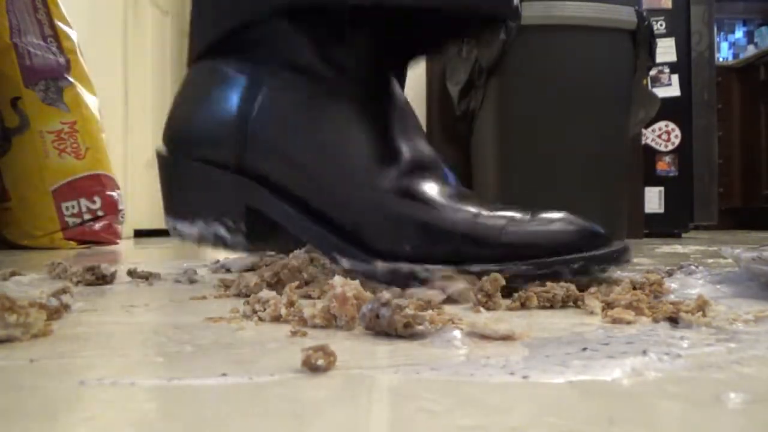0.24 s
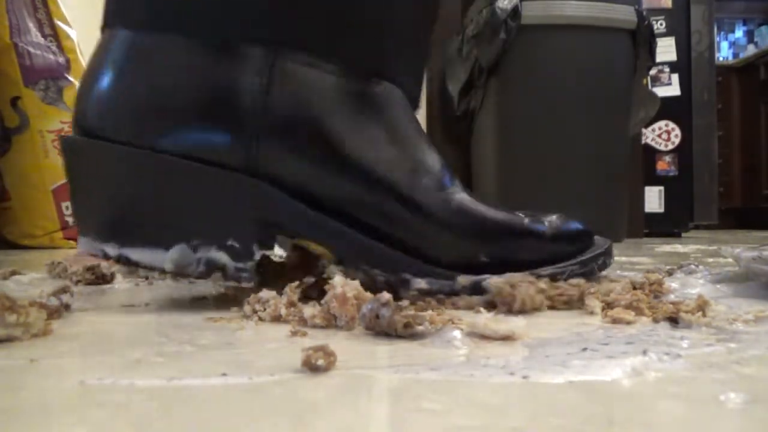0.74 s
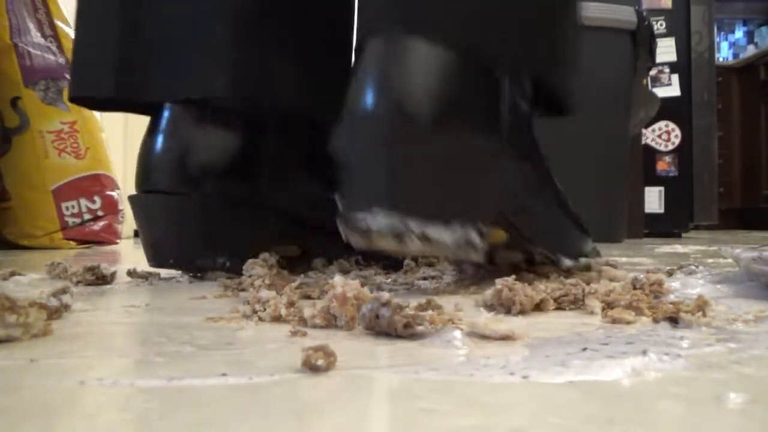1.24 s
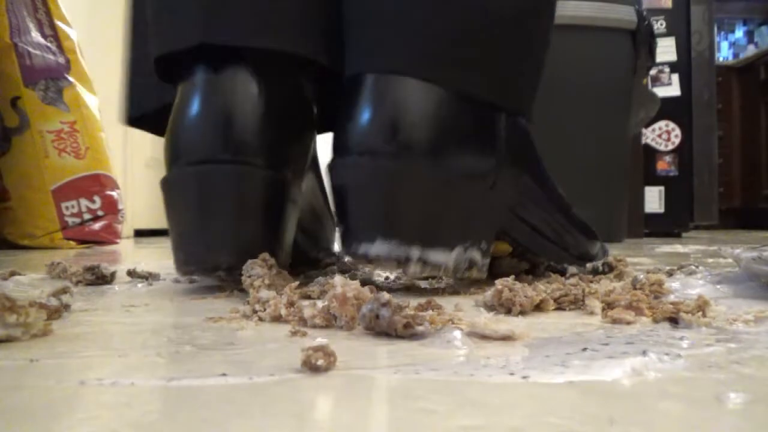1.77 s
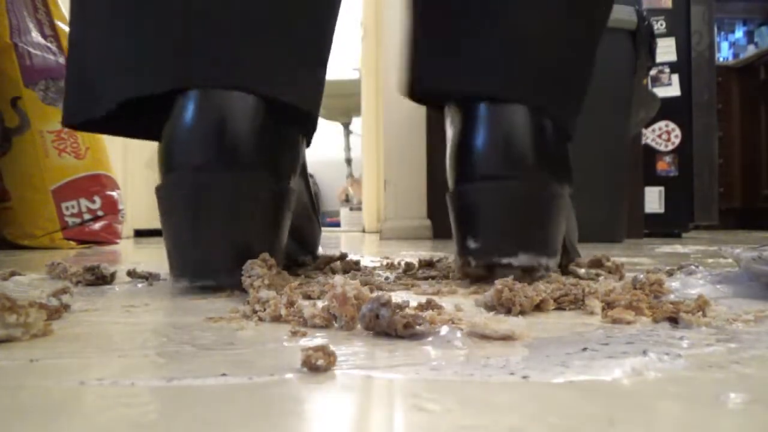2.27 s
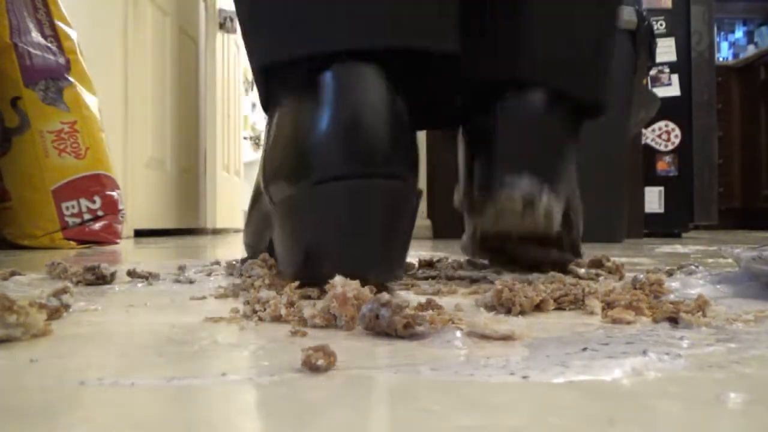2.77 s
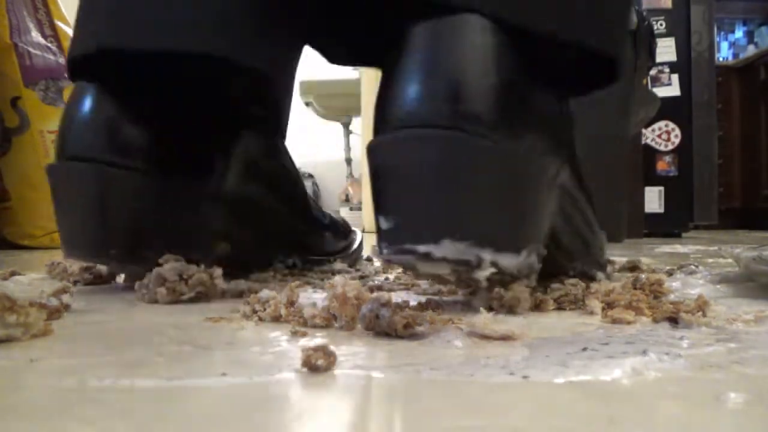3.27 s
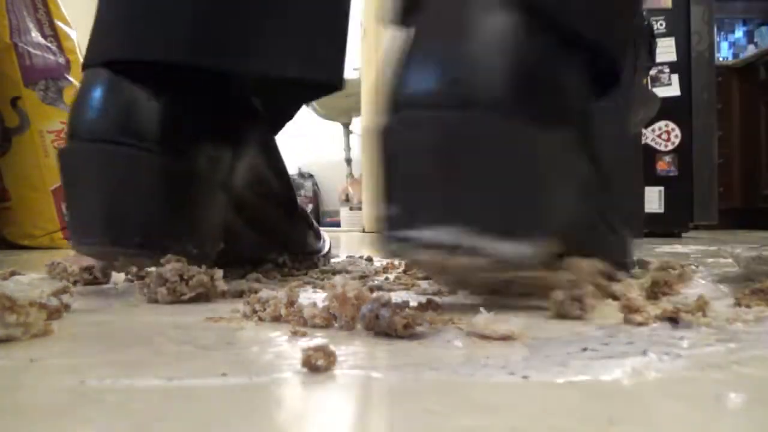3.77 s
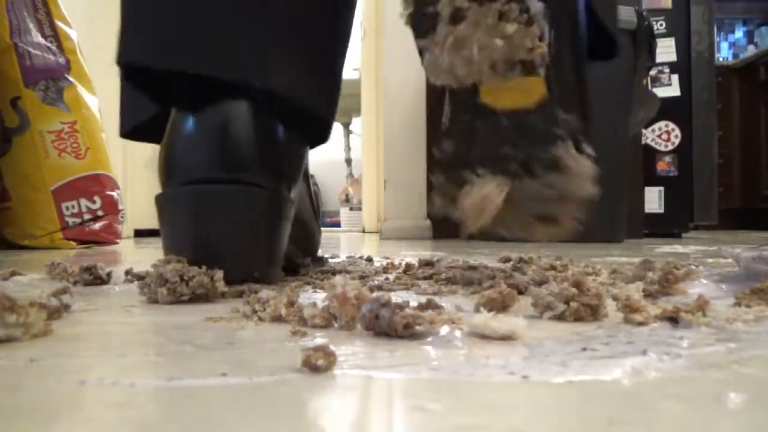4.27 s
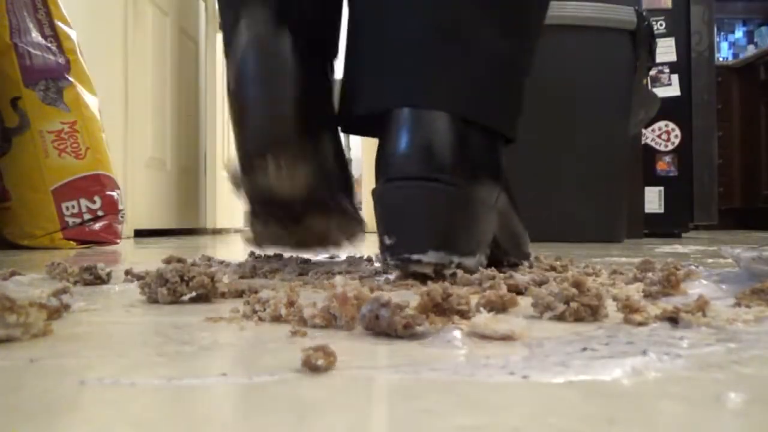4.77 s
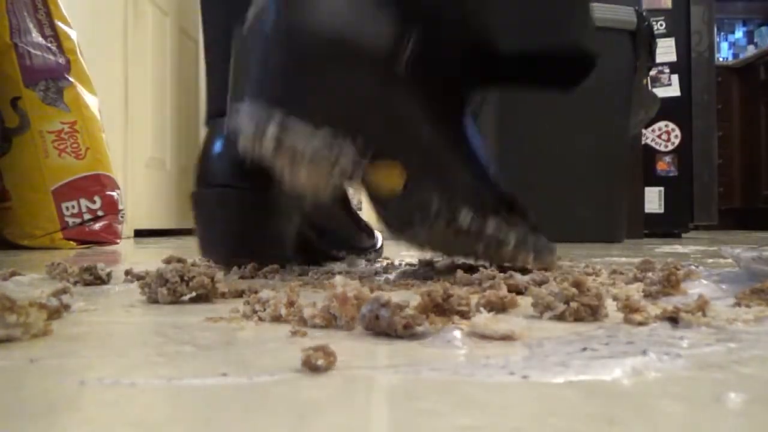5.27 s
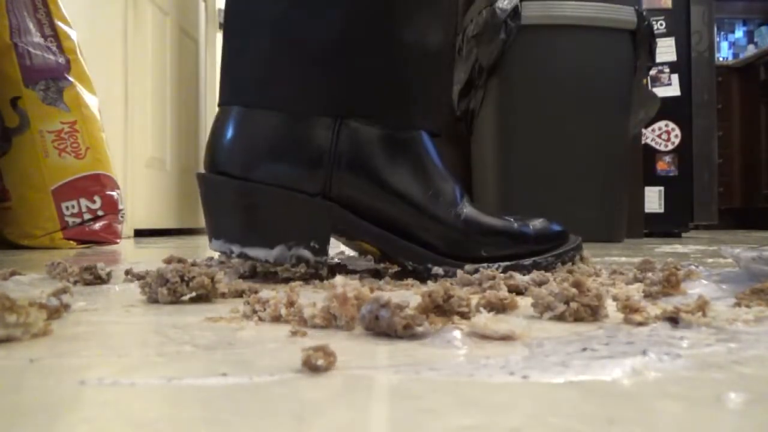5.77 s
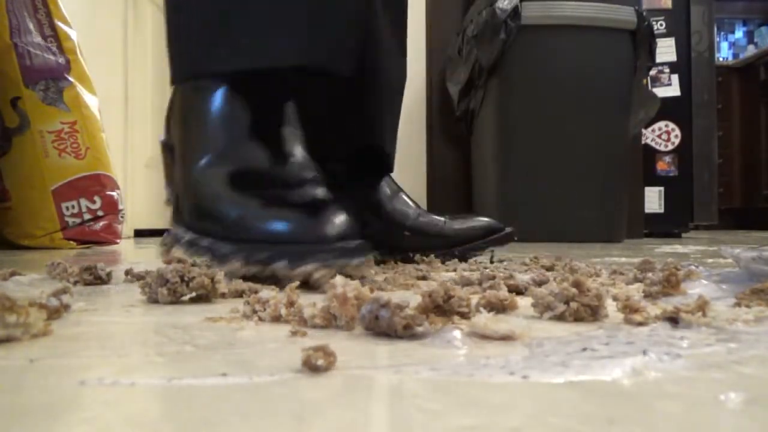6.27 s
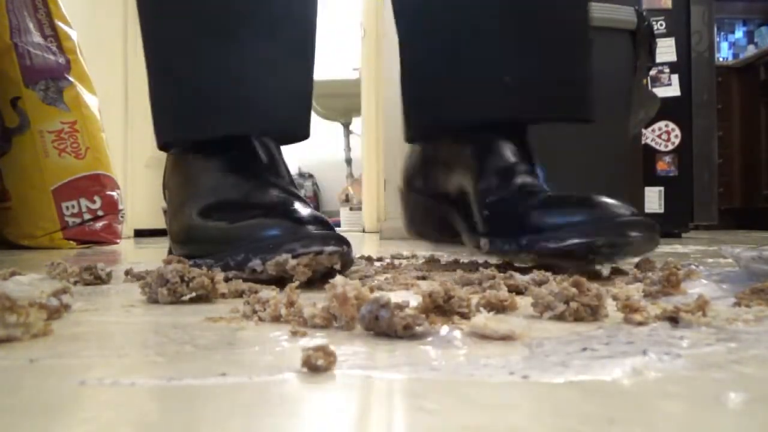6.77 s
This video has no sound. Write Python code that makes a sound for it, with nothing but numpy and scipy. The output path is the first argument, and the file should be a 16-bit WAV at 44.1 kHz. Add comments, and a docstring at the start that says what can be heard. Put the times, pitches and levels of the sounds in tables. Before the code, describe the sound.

Close, wet crackling and crumb snapping as boots stomp, grind and peel off mushy food on tile, with low heel thumps and short squeaky creaks.

```python
"""Sticky mashed food crackles as heavy boots tread it into a tiled kitchen floor, close to the microphone.
Crackle: thousands of short sine grains over noise hiss and rustle, shaped by each tread and peel.
Snaps: single cracks with splinters. Thuds: pushes into floor modes. Creaks: slip pulses into boot modes.
Smacks: falling, rough sine bursts. A short room tail and a soft, steady air hum lie around them."""
import sys
import numpy as np
from scipy import signal
from scipy.fft import rfft, irfft, next_fast_len
from scipy.io import wavfile
from scipy.ndimage import uniform_filter1d, map_coordinates

SR = 44100
rng = np.random.default_rng(int(sys.argv[2]) if len(sys.argv) > 2 else 0)


def wav_record(signal):
    """Record a signal, one row per channel, as 16-bit PCM in the file named by sys.argv[1]."""
    frames = np.transpose(np.atleast_2d(signal))
    bounded = np.clip(frames, -1, 1)
    # unit amplitude maps onto the largest positive 16-bit level
    quanta = np.round(bounded * 32767).astype(np.int16)
    wavfile.write(sys.argv[1], SR, quanta)


N = 310023


def amp(db):
    """Decibels to gain."""
    return 10 ** (np.asarray(db) / 20)


def unit(x):
    """Scale to rms 1."""
    return x / np.sqrt(np.mean(x ** 2) + 1e-20)


def along(points, hz):
    """Interpolate (Hz, value) points on a log frequency axis."""
    f, v = np.transpose(points)
    return np.interp(np.log(hz + 1), np.log(f + 1), v)


def filtered(x, response):
    """Multiply the spectrum of x by a complex response of frequency."""
    m = next_fast_len(N + SR // 2)
    hz = np.fft.rfftfreq(m, 1 / SR)
    return irfft(rfft(x, m) * response(hz), m)[..., :N]


def resonant(modes):
    """Response of a body with (Hz, width Hz, dB) modes, alternating in sign."""
    def response(f):
        total = 0
        for k, (center, width, db) in enumerate(modes):
            damping = 1j * f * width
            total = total + (-1) ** k * amp(db) * damping / (center * center - f * f + damping)
        return total
    return response


def wobble(rate):
    """Smooth random curve, rate knots per second."""
    knots = rng.standard_normal(int(N * rate / SR) + 4)
    return map_coordinates(knots, [np.arange(N) * rate / SR])


def noise(spectrum, apart):
    """Coloured stereo noise of rms 1; above the bass a share differs between the sides."""
    def response(hz):
        return amp(along(spectrum, hz)) * [1 + 0 * hz, apart * hz / (hz + 400)]
    mid, side = filtered(rng.standard_normal((2, N)), response)
    return unit(np.array([mid + side, mid - side]))


def grains(s, db, hz, pan_db, cycles, size):
    """Panned sines that swell within part of a cycle and fall 20 dB in the given number of cycles."""
    samples = np.arange(size)
    turns = samples / SR * np.minimum(hz, SR / 3)[:, None]
    decay = amp(db[:, None] - 20 * turns / np.reshape(cycles, (-1, 1)))
    swell = 1 - np.exp(-turns / 0.24)
    wave = decay * swell * np.sin(2 * np.pi * turns)
    at = (np.round(s * SR).astype(int)[:, None] + samples).ravel()
    sides = []
    for side in (1, -1):  # left, right
        panned = wave * amp(side * pan_db / 2)[:, None]
        sides.append(np.bincount(at, panned.ravel(), N + SR)[:N])
    return np.array(sides)


def squash():
    """Crackle level [dB], treble [dB] and peeling share: each move rises, holds, falls and settles."""
    # sole comes down and grinds: (time [s], 20 dB rise before it [s], hold [s],
    # crackle level at first [dB], at last [dB], treble [dB, offset added in mash])
    treads = [(0.278, 0.0012, 0.11, -33, -48, -5), (0.393, .005, 0.16, -39, -43, -4.5),
              (0.605, .01, 0.27, -45.5, -57, -1.5), (1.267, 0.0015, 0.19, -27.5, -33.5, -6.5),
              (2.244, 0.033, 0.18, -33, -30.5, -1), (2.932, 0.0052, 0.0055, -133, -43.5, 21),
              (3.1, 0.036, 0.12, -29.5, -25, -5.5), (3.262, 0.024, 0.32, -40.5, -38.5, -7.5),
              (3.637, 0.071, 0.24, -36.5, -47, -3), (4.449, 0.02, 0.13, -30, -24.5, -2),
              (4.819, 0.0035, 0.19, -32, -25, -5.5), (5.315, 0.0018, 0.22, -33.5, -33.5, -2.5),
              (5.567, 0.0083, 0.024, -34, -43.5, 4), (5.768, 0.0063, 0.093, -43.5, -42, -3),
              (5.908, 0.025, 0.055, -31.5, -33.5, -6), (6.386, 0.059, 0.1, -33.5, -35, 1.5),
              (6.721, .01, 0.072, -37.5, -52.5, -5), (6.819, 0.025, 0.075, -37.5, -35.5, -3),
              (6.981, 0.053, 0.052, -27, -37.5, -9.5)]
    # sole peels off the sticky floor: (time of full pull [s], 20 dB swell before it [s], hold [s],
    # crackle level [dB], treble [dB, offset added in mash])
    peels = [(0.045, 0.086, 0.011, -32.5, -4), (1.003, 0.17, 0.035, -25.5, -3.5),
             (1.793, 0.18, 0.19, -33, -4.5), (2.705, 0.11, 0.062, -26, -11),
             (2.805, 0.025, 0.042, -20, -13), (3.938, 0.057, 0.076, -30.5, -3),
             (4.134, 0.02, 0.108, -26, -6), (6.51, 0.065, 0.064, -27, -6.5)]
    stop_s, let_go_s = 0.041, 0.037  # 20 dB of fall: a tread stops, a peel tears free
    # after a move the mash settles: start re last level, fall rate, treble
    settle_db, settle_db_per_s, settle_treble_db = -17, 37, -5
    rest_db, rest_treble_db = -58.5, 2.5  # faint crackle under a standing boot

    t = np.arange(N) / SR
    moves = [(s, rise, hold, stop_s, first, last, treble, False)
             for s, rise, hold, first, last, treble in treads]
    moves += [(s, swell, hold, let_go_s, db, db, treble, True)
              for s, swell, hold, db, treble in peels]
    power = amp(2 * rest_db) * np.ones(N)
    treble_power = rest_treble_db * power  # treble weighted by power
    peel_power = np.zeros(N)
    for s, rise, hold, fall, first, last, treble, is_peel in moves:
        end = s + hold
        press_db = np.interp(t, [s - 4 * rise, s, end, end + 4 * fall],
                             [first - 80, first, last, last - 80])
        press = amp(2 * press_db)
        settle = (t > end) * amp(2 * (last + settle_db - settle_db_per_s * (t - end).clip(0)))
        power += press + settle
        treble_power += treble * press + settle_treble_db * settle
        peel_power += is_peel * press
    return 10 * np.log10(power), treble_power / power, peel_power / power


def mash():
    """Crumbs break and sticky threads part in clumps, over a fine hiss and a dull wet rustle."""
    crumb_colour = [(700, -12), (1100, -10), (1600, -0.5), (2500, 1), (4500, 2), (9000, 6.5), (11000, 2),
                    (13600, -8.5)]  # crackle spectrum: (frequency [Hz], gain [dB])
    mush_colour = [(71, -44), (120, -13), (206, -4), (403, 1), (837, -0.5), (2000, -4), (2600, -51),
                   (4400, -120)]  # wet rustle spectrum: (frequency [Hz], relative density [dB per Hz])

    crackle_db, treble_db, peeling = squash()
    lulls = 0.8 * wobble(60)
    clumps = (lulls + 1.0 * wobble(250)).clip(-3, 1.9)
    colour = 0.3 * wobble(45)  # one clump breaks higher, the next lower

    count = 24000
    when_s = rng.random(count) * (N - 1) / SR
    at = (when_s * SR).astype(int)
    size = rng.exponential(1, count)
    tone, pan, life = rng.standard_normal((3, count))
    spread_db = 4.8 - 2.2 * peeling[at]  # threads part more evenly than crumbs break
    # low grains ring longer, so they start weaker
    grain_db = spread_db * size.clip(0, 4.6) + 2.48 * tone + 1.5 * clumps[at]
    grain_hz = 5000 * np.exp(0.44 * tone + colour[at])
    cycles = 1.66 * np.exp(0.5 * life)
    crackle = grains(when_s, grain_db, grain_hz, 3.1 * pan - .6, cycles, size=96)
    crackle = unit(filtered(crackle, lambda hz: amp(along(crumb_colour, hz))))
    # the tread, not chance, sets the slow level
    slow_power = uniform_filter1d(np.mean(crackle ** 2, 0), size=SR // 16)
    crackle /= np.sqrt(np.abs(slow_power) + 0.04)
    hiss = noise(crumb_colour + [(16000, -60)], apart=0.26)
    crackle += amp(-9.5 + 4.36 * clumps) * hiss

    treble = filtered(crackle, lambda hz: 1 / (1 + (6500 / (hz + 1)) ** 4))
    low = filtered(crackle, lambda hz: 1 / (1 + (hz / 2600) ** 4))
    crackle -= 0.6 * peeling * low  # threads are thinner than crumbs
    crackle += (amp(5.0 + treble_db) - 1) * treble  # thin dry crumbs break brighter

    lumps_db = 3 * wobble(40).clip(-3, 1.5)
    rustle_db = -31.0 + lumps_db + 0.57 * crackle_db  # swells less than the crackle
    rustle = amp(rustle_db) * noise(mush_colour, apart=0.16)
    return amp(crackle_db) * crackle + rustle


def snaps():
    """A hard crumb breaks: one sharp crack, and splinters of other pitch strewn through the burst."""
    # (time [s], level [dB], pitch [Hz], burst length [ms])
    snap_table = [(0.0587, -11, 6900, 0.6), (0.2792, -9, 5700, 3.1), (0.2848, -7, 5600, 0.4),
                  (0.3994, -16, 5800, 0.7), (0.4083, -19, 4000, 1.5), (0.519, -15, 6400, 0.3),
                  (0.5473, -23, 2600, 0.4), (0.6369, -12, 8000, 0.6), (0.6962, -20, 5700, 0.3),
                  (0.749, -18, 8000, 0.3), (0.8085, -15, 6900, 0.4), (0.8814, -15, 6400, 0.3),
                  (1.2757, -8, 3500, 2.7), (1.2798, -7, 4600, 3.2), (1.297, -9, 3100, 1.2),
                  (1.3547, -6, 5400, 0.7), (1.3633, -13, 8200, 2.8), (1.9, -8, 3900, 1.7),
                  (1.9134, -8, 3900, 3.0), (2.0287, -12, 7000, 0.3), (2.0291, -9, 1900, 0.3),
                  (2.2245, -16, 4300, 1.0), (2.2509, -6, 4600, 0.5), (2.2632, -12, 3700, 1.3),
                  (2.2726, -7, 5000, 1.9), (2.2863, -7, 5000, 2.5), (2.3049, -9, 7400, 0.4),
                  (2.3715, -7, 5600, 0.4), (2.3959, -4, 6700, 0.3), (2.409, -5, 6200, 0.4),
                  (2.4286, -6, 4000, 1.6), (2.4333, -6, 4900, 0.4), (2.6991, -8, 6700, 1.9),
                  (2.764, -6, 4700, 0.3), (2.9443, -14, 5900, 1.1), (3.1079, -7, 7000, 1.2),
                  (3.1503, -6, 5000, 1.7), (3.1846, -7, 3700, 1.0), (3.2305, -9, 8100, 3.6),
                  (3.5432, -15, 4600, 0.5), (3.6965, -9, 6900, 0.3), (4.0715, -12, 3000, 0.5),
                  (4.2078, -5, 4000, 0.6), (4.2362, -8, 4200, 0.6), (4.2387, -7, 4200, 0.8),
                  (4.4482, -6, 5200, 2.4), (4.5889, -7, 4600, 3.6), (4.8226, -6, 6400, 0.6),
                  (4.8508, -8, 7500, 0.7), (4.8846, -4, 6500, 4), (4.9569, -5, 5500, 0.7),
                  (4.9685, -4, 6800, 2.5), (5.0034, -6, 6100, 3.5), (5.0987, -10, 6500, 0.3),
                  (5.3199, -7, 5600, 0.4), (5.4395, -7, 8000, 0.9), (5.5027, -7, 7300, 0.6),
                  (5.5675, -11, 4500, 1.0), (5.7129, -20, 7100, 0.7), (5.9108, -7, 8200, 0.4),
                  (6.3904, -7, 4200, 0.3), (6.442, -14, 5000, 0.5), (6.4751, -4, 5700, 0.6),
                  (6.6522, -18, 5000, 0.5), (6.8566, -8, 6100, 0.3), (6.9663, -19, 2400, 3.4)]
    full_burst_ms = 2.5  # a shorter burst throws weaker splinters
    crest_db = 9.5  # what a grain loses before its first crest

    s, db, hz, ms = np.transpose(snap_table)[..., None]
    ms = ms.clip(.1, 8)
    late, tone, size, pan = rng.random((len(s), 4, 10)).transpose(1, 0, 2)
    splinter = np.arange(10) > 0  # grain 0 is the crack
    when_s = s + ms / 1000 * 1.3 * late * splinter
    short_loss_db = 13 * np.log10(full_burst_ms / ms).clip(0)
    level_db = db + crest_db - splinter * (5.9 + 4.7 * size + 0.56 * late + short_loss_db)
    pitch_hz = hz * np.exp(1.11 * (tone - .45) * splinter)
    cycles = np.where(splinter, 2.8, 1.3 + 0.052 * ms)  # the crack of a long burst rings longer
    pan_db = 12.3 * (pan - .55)
    burst = grains(when_s.ravel(), level_db.ravel(), pitch_hz.ravel(), pan_db.ravel(),
                   cycles.ravel(), size=256)

    def small_and_soft(hz):  # too small for much bass, too soft for the top
        return (1j * hz / (1400 + 1j * hz)) ** 2 / (1 + 1j * hz / 9000)
    return filtered(burst, small_and_soft)


def thuds():
    """A heel pushes for a few ms and settles unevenly, knocking tiles and booming the floor below."""
    # (time [s], push on tiles [dB], push on floor below [dB], sole slap [dB])
    thud_table = [(0.279, -16, -17.5, -33), (0.764, -28.5, -32, -32), (1.275, -12.5, -23, -19),
                  (2.48, -9.5, -39, -25), (4.451, -5, -16.5, -17), (4.819, -2.5, -18.5, -27),
                  (5.32, -16, -33, -31), (5.774, -10, -17, -31), (5.966, -9.5, -33, -21.5),
                  (6.869, -21, -24.5, -43), (6.965, -12, -26, -17.5)]
    # floor modes, the first two the low boom: (frequency [Hz], width [Hz], gain [dB])
    floor_modes = [(61.7, 10.6, 5), (131, 48, 6.5), (174, 18, -14.5), (207, 79, -6), (420, 840, -6.5)]
    push_s, settle_t60_s = 0.00065, 0.27
    slap_t60_s, slap_hz = 0.049, 2450

    knock, boom, slap = np.zeros((3, N + SR))
    t = np.arange(SR // 8) / SR
    u = t / push_s
    push = u * np.exp(-u)
    for s, knock_db, boom_db, slap_db in thud_table:
        settling = amp(-60 * t / settle_t60_s) * rng.standard_normal(len(t))
        at = slice(round(s * SR), round(s * SR) + len(t))
        knock[at] += amp(knock_db) * (push + 0.29 * settling)
        boom[at] += amp(boom_db) * (push + 0.25 * settling)
        slap[at] += amp(slap_db - 60 * t / slap_t60_s) * rng.standard_normal(len(t))
    rung = filtered(knock[:N], resonant(floor_modes[2:])) + filtered(boom[:N], resonant(floor_modes[:2]))
    low = filtered(rung, lambda hz: 1 / (1 + 1j * hz / 400) ** 2)
    return low + filtered(slap[:N], lambda hz: 1j * hz / (300 + 1j * hz) / (1 + 1j * hz / slap_hz))


def creaks():
    """The boot sticks and slips; the longer it sticks, the harder it lets go."""
    creak_rates = [
        [(.9857, 186), (1.015, 286), (1.0702, 123)],
        [(1.5478, 131), (1.585, 149), (1.607, 57), (1.65, 177), (1.6722, 52)],
        [(1.7869, 448), (1.816, 450), (1.838, 195), (1.858, 185), (1.885, 252), (1.946, 76), (1.9806, 48)],
        [(2.7434, 488), (2.777, 138), (2.84, 312), (2.8751, 110)],
        [(3.963, 960), (3.984, 1215), (4.002, 840), (4.01, 790), (4.027, 1090)],
        [(4.1359, 299), (4.155, 353), (4.18, 190), (4.2831, 84)],
        [(4.6809, 49), (4.764, 242), (4.782, 44), (4.819, 204)],
        [(6.4515, 190), (6.49, 165), (6.505, 230), (6.522, 430), (6.537, 630), (6.565, 400), (6.572, 200),
         (6.5856, 130)],
    ]  # one list per creak: (time [s], slip rate [1/s])
    creak_levels = [1, -8.5, 5, 3, -8, 5, -7.5, 2.5]  # slip strength per creak [dB]
    hollow_levels = [2, 4, -0.5, 1.5, 3, -0.5, 6.5, 2]  # extra ring of the lowest boot mode per creak [dB]
    boot_modes = [(640, 330, -1), (1570, 620, 3.5), (2600, 1600, 2), (3940, 450, 2.5), (4800, 730, -2)]  # rung by a slip: (frequency [Hz], width [Hz], gain [dB])

    slips, hollow = np.zeros((2, N))
    for rows, creak_db, hollow_db in zip(creak_rates, creak_levels, hollow_levels):
        s, rate = np.transpose(rows)
        t = np.arange(s[0], s[-1], 1 / SR)
        slips_done = np.cumsum(np.interp(t, s, rate)) / SR
        when_s = np.interp(np.arange(int(slips_done[-1] + .1) + 1), slips_done, t)
        stick_s = np.gradient(when_s)
        scatter, jitter = rng.standard_normal((2, len(when_s)))
        when_s = when_s - .0004 + (.00003 + .015 * stick_s.clip(0, .004)) * jitter
        strength = amp(creak_db + 1.6 * scatter) * (stick_s.clip(0, .012) / 0.013) ** 0.28
        slips[np.round(when_s * SR).astype(int)] = -strength
        hollow[round(s[0] * SR) - 99:] = amp(hollow_db) - 1
    rung = filtered(slips, resonant(boot_modes)) + filtered(slips * hollow, resonant(boot_modes[:1]))

    def rubber(hz):  # a slip of rubber is neither instant nor deep
        return 1j * hz / (600 + 1j * hz) / (1 + 1j * hz / 5500) ** 2
    return filtered(rung, rubber)


def smacks():
    """A wet pocket under the sole bursts: rough cycles of a falling, wavering pitch that stop short."""
    # (time [s], level [dB], pitch [Hz], length [ms])
    smack_table = [(1.1135, -27, 750, 1.8), (3.7355, -24, 1600, 1.5), (5.3272, -9, 2300, 2.4),
                   (5.331, -9, 2300, 4.8)]
    out = np.zeros(N)
    for s, db, hz, ms in smack_table:
        u = np.linspace(0, 1, round(ms * SR / 1000))
        waver = .12 * np.interp(u, np.linspace(0, 1, 10), rng.standard_normal(10))
        pitch_hz = hz * (1.25 - u / 2 + waver)
        cycles = np.sin(2 * np.pi * np.cumsum(pitch_hz) / SR)
        rough = cycles + .25 * rng.standard_normal(len(u))
        envelope = np.sqrt(np.sin(np.pi * np.sqrt(u)).clip(0))
        out[round(s * SR):][:len(u)] = amp(db) * envelope * rough
    return filtered(out, lambda hz: (1j * hz / (400 + 1j * hz)) ** 2)


def air():
    """Steady room hum: coloured noise with a slightly wavering level."""
    air_colour = [(24, -43), (40, 11.5), (129, -1), (540, 7), (1470, 5.5), (3210, 4.5), (9140, -3.5),
                  (13500, -10.5)]  # (frequency [Hz], relative density [dB per Hz])
    return amp(-51 + 0.17 * wobble(14)) * noise(air_colour, apart=0.4)


def kitchen(x):
    """Each frequency of the room's answer dies at its own speed; its bass is alike on both sides."""
    decay_times = [(150, 0.54), (1500, 0.39), (10000, 0.027)]  # (frequency [Hz], T60 [s])
    hz, t, z = signal.stft(rng.standard_normal((2, SR // 2)), SR, nperseg=256)
    z[1] *= 0.49 * (hz / (hz + 500))[:, None]
    decay = amp(-60 * t / along(decay_times, hz)[:, None])
    mid, side = signal.istft(z * decay, SR, nperseg=256)[1]
    tail = np.array([mid + side, mid - side]) / np.linalg.norm(mid)
    delayed = np.pad(x, (120, 0))  # samples
    return signal.fftconvolve(delayed[None], tail, axes=1)[:, :N]


def scene():
    """Boots and mash in the room, over its air; what breaks right by the microphone is drier."""
    left_lean = amp([[.4], [-.4]])  # left up, right down
    near = mash() + left_lean * (creaks() + thuds())
    cracks = snaps() + smacks()
    room = amp(-12.5) * kitchen((near + cracks / 2).mean(0))
    return near + cracks + room + air()


def record(dry):
    """The small microphone drops the deepest bass, rounds off the loudest peaks and limits the band."""
    top_hz = 13650
    small = filtered(dry, lambda hz: (1j * hz / (45 + 1j * hz)) ** 2)
    rounded = small / (1 + np.abs(small / .62) ** 3) ** (1 / 3)
    return filtered(rounded, lambda hz: 1 / (1 + (hz / top_hz) ** 90))


dry = scene()
out = record(dry)
wav_record(out)
```